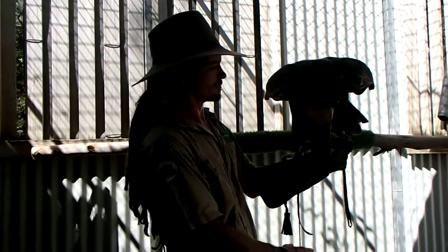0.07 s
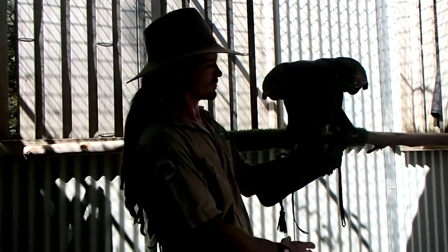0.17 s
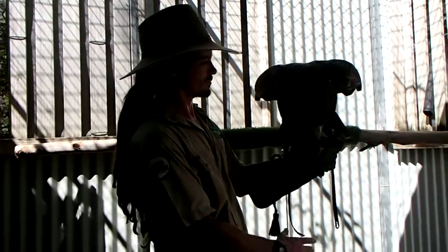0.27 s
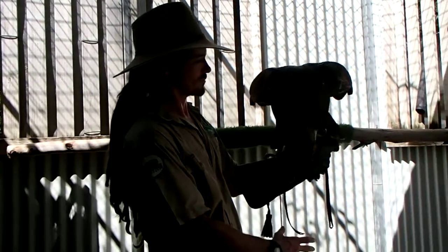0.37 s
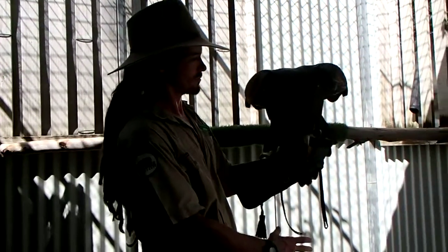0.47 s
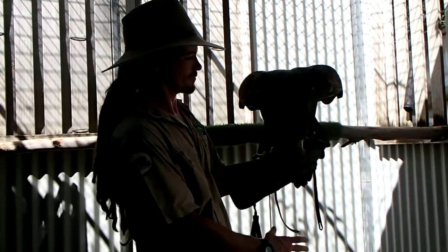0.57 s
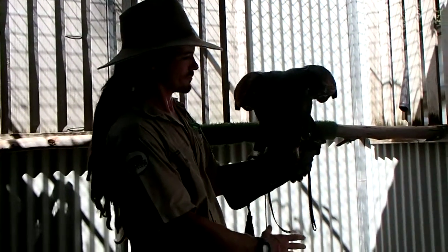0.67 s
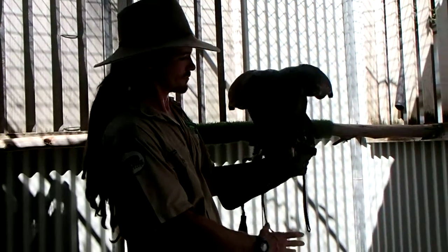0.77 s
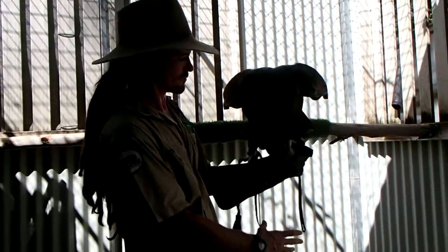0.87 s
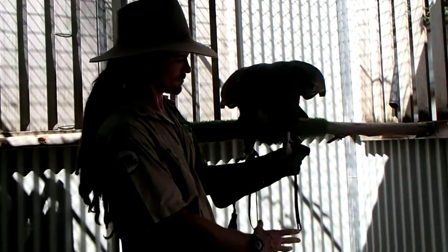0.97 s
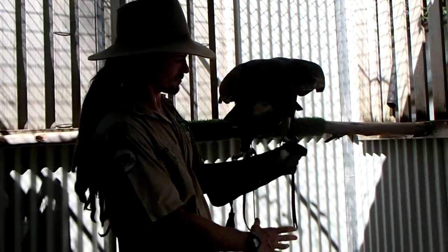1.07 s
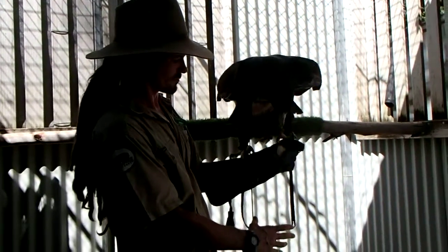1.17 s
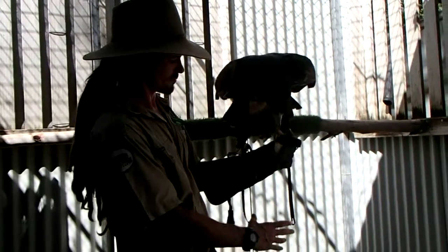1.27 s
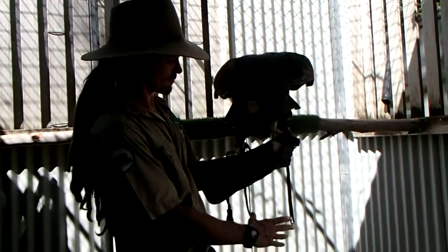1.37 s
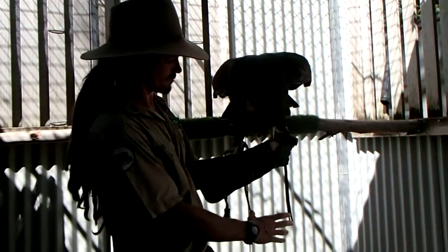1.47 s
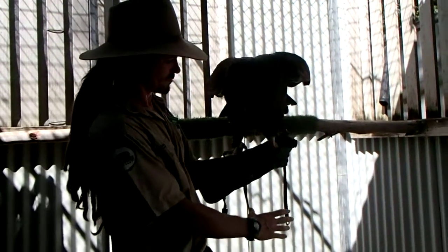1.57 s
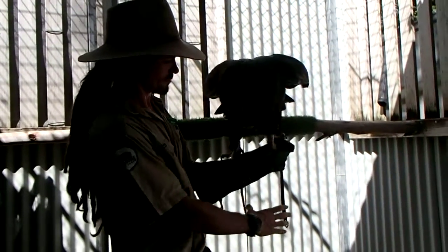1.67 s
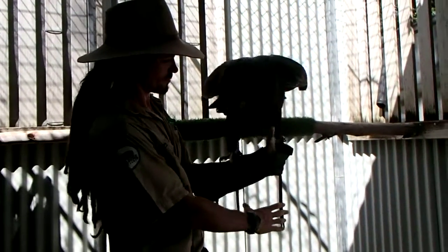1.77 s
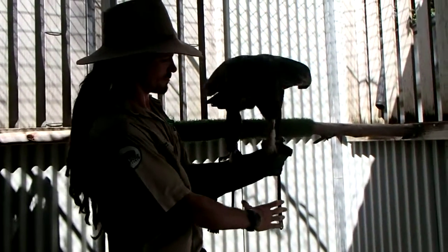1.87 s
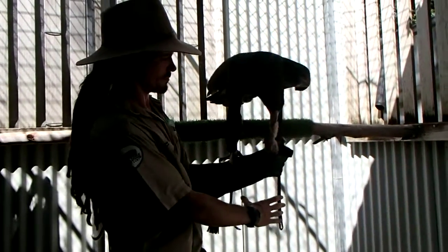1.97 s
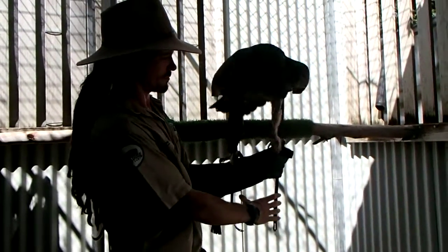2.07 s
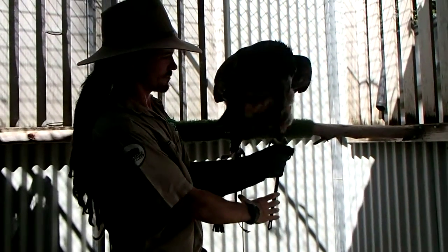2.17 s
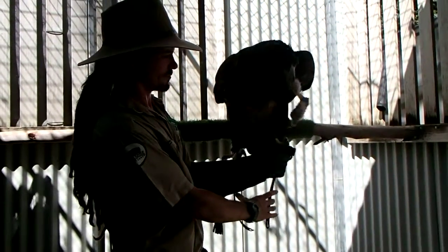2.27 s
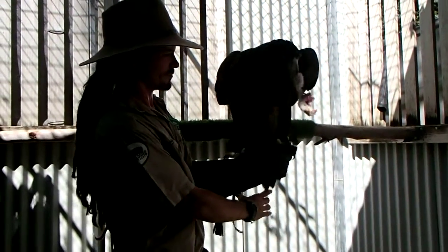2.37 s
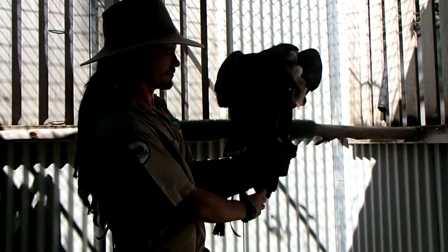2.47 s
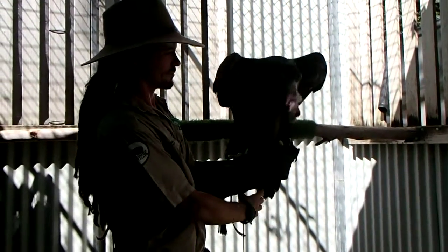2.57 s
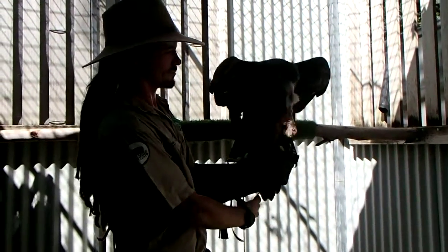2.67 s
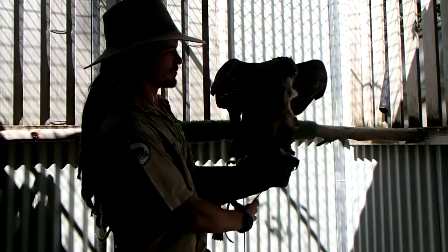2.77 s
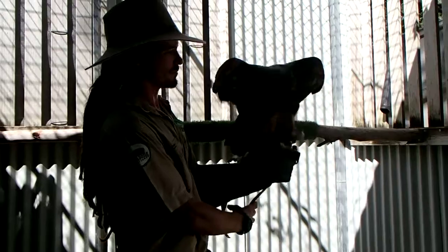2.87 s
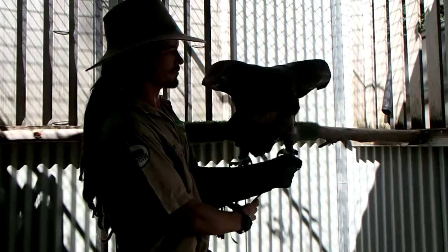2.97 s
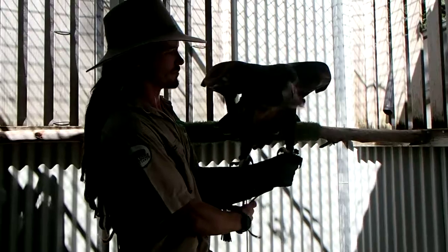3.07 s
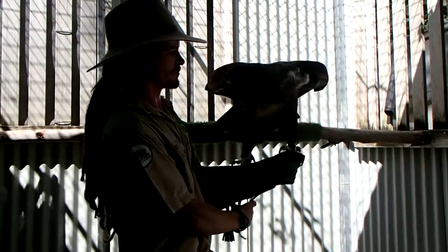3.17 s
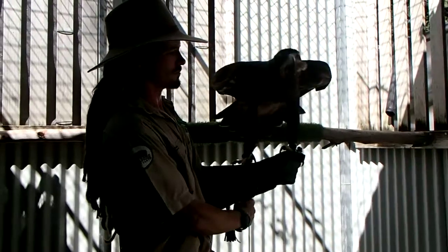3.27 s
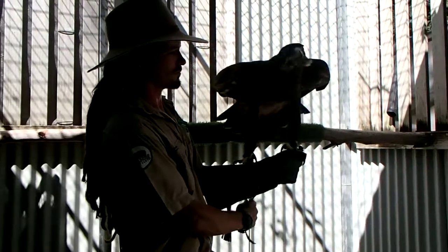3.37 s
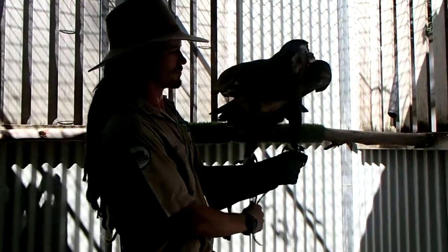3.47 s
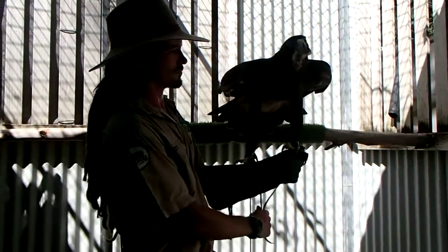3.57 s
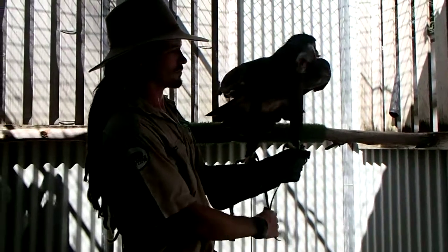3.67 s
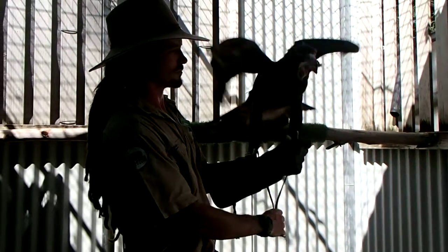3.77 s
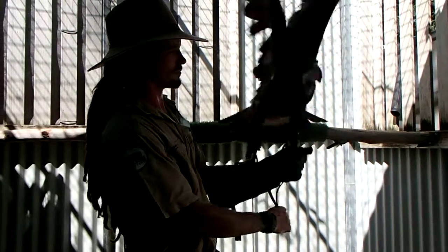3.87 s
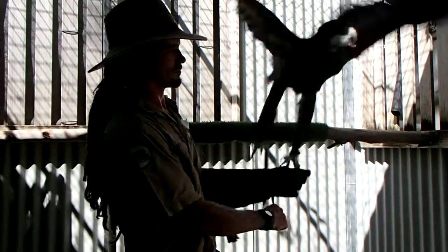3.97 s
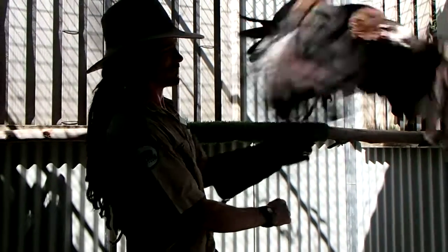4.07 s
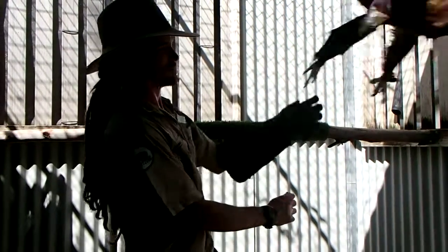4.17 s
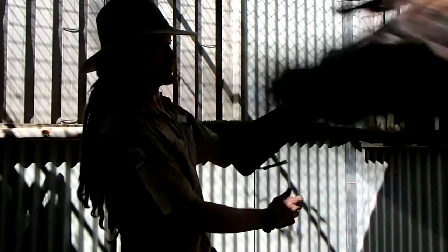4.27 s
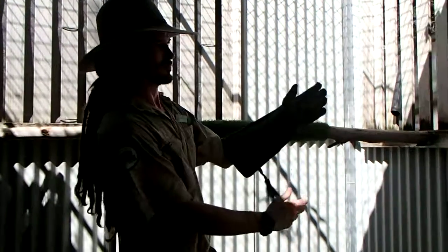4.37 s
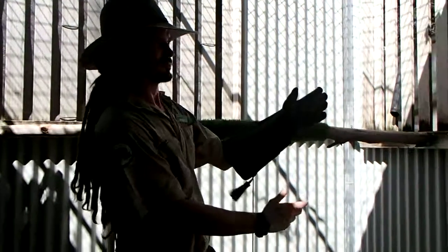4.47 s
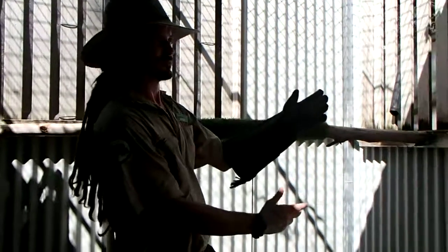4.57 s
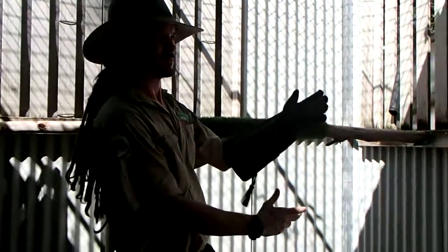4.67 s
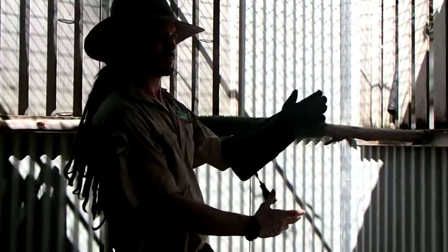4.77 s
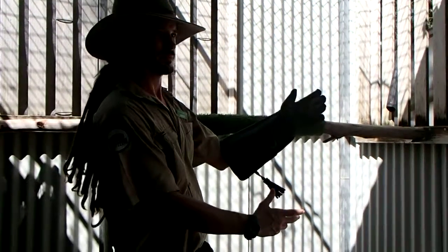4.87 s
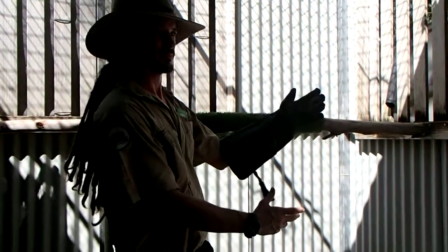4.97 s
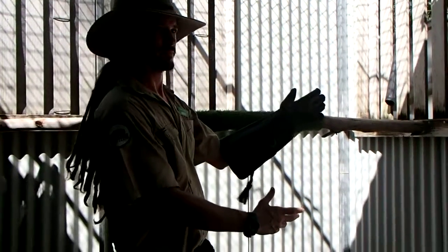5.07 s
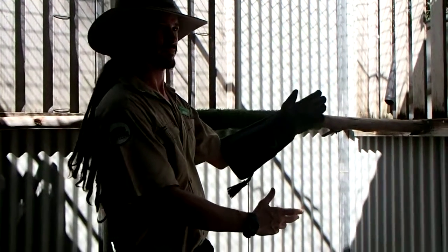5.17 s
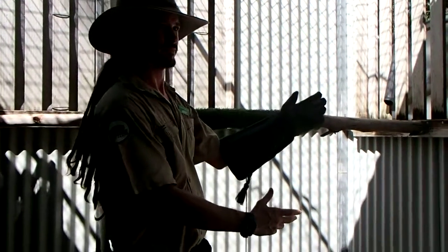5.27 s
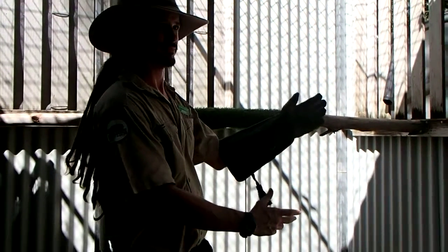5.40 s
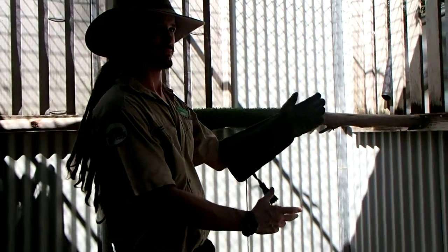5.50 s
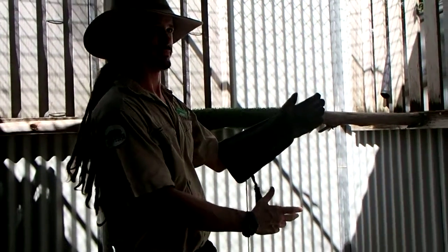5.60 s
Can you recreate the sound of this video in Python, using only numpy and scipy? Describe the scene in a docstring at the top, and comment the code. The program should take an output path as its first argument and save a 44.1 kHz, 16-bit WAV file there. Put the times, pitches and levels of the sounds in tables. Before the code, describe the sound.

In a quiet aviary, small birds chirp far off over a soft outdoor hush. Straps tick faintly on a leather glove, with one dry click close by, as a large bird ruffles its feathers. It then takes off with loud, cracking wing beats and passes close, its air buffeting the microphone. Farther away it flaps again and gives one short, hoarse high call.

```python
"""Take-off from the glove

In an aviary: quiet outdoor air, small birds far off, ticking straps and one dry click close by.
A large bird shifts on a leather glove, then takes off with cracking wing beats and flies past the
microphone. The wash of its wings buffets the microphone; farther off it flaps again, with one short
high call. Sheet-metal walls give a brief echo."""
import sys
import numpy as np
from scipy import signal
from scipy.fft import rfft, irfft, next_fast_len
from scipy.io import wavfile
from scipy.ndimage import map_coordinates

SR = 44100
rng = np.random.default_rng(int(sys.argv[2]) if len(sys.argv) > 2 else 0)


def log_audio(samples):
    """Write samples as a 16-bit WAV file to the path given in sys.argv[1]."""
    # one column per channel
    frames = np.atleast_2d(samples).T
    # limit to full scale, then quantise
    limited = np.clip(frames, -1, 1)
    pcm = np.round(limited * 32767).astype(np.int16)
    wavfile.write(sys.argv[1], SR, pcm)


N = 248724
TIME = np.arange(N) / SR


def amp(db):
    return 10 ** (np.asarray(db) / 20)


def unit(x):
    return x / np.sqrt(np.mean(x ** 2) + 1e-20)


def along(points, hz):
    """Interpolate (frequency [Hz], value) points on a log axis."""
    f, v = np.transpose(points)
    return np.interp(np.log(hz + 1), np.log(f + 1), v)


def level(rows, fade):
    """Gain per sample from (time [s], level [dB]) rows, dying away outside them."""
    s, db = np.transpose(rows)
    outside = np.abs(TIME - np.clip(TIME, s[0], s[-1]))
    return amp(np.interp(TIME, s, db)) * np.exp(-outside / fade)


def swell(s, rise, fall):
    """A gain that grows to 1 at time s and dies away; rise and fall are time constants [s]."""
    return np.exp(-np.where(TIME < s, (s - TIME) / rise, (TIME - s) / fall))


def wobble(rate, size=N):
    """A smooth random curve, rate knots a second."""
    knots = rng.standard_normal(size // 4 + 8)
    return map_coordinates(knots, [np.arange(size) * rate / SR], mode="mirror")


def filtered(x, response):
    """x through a frequency response."""
    m = next_fast_len(N + 8192)
    return irfft(rfft(x, m) * response(np.fft.rfftfreq(m, 1 / SR)), m)[:N]


def coloured(spectrum, gain=1):
    """Noise times a gain, shaped by (frequency [Hz], level [dB]) points, at rms 1."""
    return unit(filtered(rng.standard_normal(N) * gain, lambda hz: amp(along(spectrum, hz))))


def noise_band(width_hz, cycles):
    """A band of noise at rms 1 around a carrier whose phase is given in cycles."""
    size = next_fast_len(len(cycles))
    z = rng.standard_normal(size) + 1j * rng.standard_normal(size)
    z = np.fft.ifft(z / (1 + (np.fft.fftfreq(size, 1 / SR) / width_hz * 2) ** 4) ** .5)
    z /= np.sqrt(np.mean(np.abs(z) ** 2) / 2)
    return np.real(z[:len(cycles)] * np.exp(2j * np.pi * cycles))


def resonant(modes):
    """Noise ringing in (frequency [Hz], width [Hz], level [dB]) resonances."""
    return sum(amp(db) * noise_band(width, hz * TIME) for hz, width, db in modes)


def causal(gain):
    """The shortest one-sided pulse with this magnitude spectrum."""
    cep = irfft(np.log(np.maximum(gain, 1e-6)))
    half = len(cep) // 2
    return irfft(np.exp(rfft(np.r_[cep[0], 2 * cep[1:half], np.zeros(half)])))


def add(track, s, sound):
    """Mix a sound in from time s."""
    i = max(round(s * SR), 0)
    track[i:i + len(sound)] += sound[:max(N - i, 0)]


# Open air around the microphone: (frequency [Hz], level [dB])
AIR_COLOUR = [(15, -48), (25, -2), (74, -13.5), (99, -8.5), (189, -3.5), (235, -8), (382, -2.5),
              (437, -6.5), (473, -8), (691, 0), (1820, -3.5), (3490, -4), (5670, -13.5), (14200, -19.5),
              (15800, -25)]
# Low drones in that air: (frequency [Hz], width [Hz], level [dB])
DRONES = [(96.3, 14, -68), (133, 20, -67)]
# Twitter far away: (time [s], level [dB])
TWITTER = [(0, -45.5), (.17, -54), (2.6, -57), (3.03, -51), (3.42, -64)]
# Its spectrum: (frequency [Hz], level [dB])
TWITTER_COLOUR = [(1500, -46), (2600, -14), (3350, -0.5), (4100, -3.5), (5000, -13), (7000, -25)]


def air(hush_db=-51.14):
    """Steady outdoor hush with two faint drones and a blur of distant twitter."""
    hush = amp(hush_db + .22 * wobble(7.4)) * coloured(AIR_COLOUR)
    drones = np.zeros(N)
    for hz, width, db in DRONES:
        band = filtered(rng.standard_normal(N), lambda f: np.exp(-2 * ((f - hz) / width) ** 2))
        drones += amp(db) * unit(band)
    twitter = amp(-3 + 2 * wobble(13)) * level(TWITTER, fade=2) * coloured(TWITTER_COLOUR)
    return hush + drones + twitter


# Resonances of a wall panel far off: (frequency [Hz], width [Hz], level [dB])
PANEL_MODES = [(748, 32, -56), (947, 55, -45), (1170, 56, -53), (2010, 60, -46), (3220, 150, -54)]


def panel_bump():
    """A soft, distant knock rings and rattles a wall panel."""
    rattle = amp(-41) * coloured(FAR_WING_COLOUR)
    ring = amp(.5) * resonant(PANEL_MODES)
    return swell(.042, rise=.008, fall=.034) * (ring + rattle)


# Straps and talons on the glove: (time [s], level [dB], pitch [Hz], fall [s])
GLOVE_TICKS = [(.367, -47.5, 1380, .008), (1.565, -49, 1914, .025), (1.651, -44.5, 4210, .009),
               (1.888, -50.5, 900, .02), (2.168, -44, 3040, .01), (2.411, -35.5, 3200, .002),
               (2.759, -40, 3900, .009)]


def glove_ticks():
    """Small contacts on leather: a sharp start and a short, broad rasp."""
    out, t = np.zeros(N), np.arange(4096) / SR
    for s, db, hz, fall in GLOVE_TICKS:
        rasp = noise_band(.6 * hz, hz * t)
        add(out, s, amp(db) * np.exp(-t / fall) * rasp)
    return out


# Small birds far off: (time [s], length [s], pitch [Hz], glide [share of pitch], level [dB])
BIRD_NOTES = [(.41, .09, 4080, 0, -56), (.67, .18, 2980, -.03, -59), (1.181, .07, 2930, .02, -57),
              (2.413, .075, 3300, 0, -51.5), (2.413, .24, 2790, -.03, -55.3), (2.535, .22, 4210, .04, -57),
              (2.52, .32, 5500, -.025, -65.5), (2.758, .014, 2920, 0, -38.5),
              (3.082, .083, 2990, -.01, -58)]


def small_birds(faint_count=10, blur_hz=22, wavers_per_note=7):
    """Thin gliding notes, blurred by distance, with fainter ones at random."""
    out = np.zeros(N)
    faint = [(rng.uniform(0, N / SR), .12, rng.uniform(4000, 6300), rng.normal(0, .02), -65.5)
             for _ in range(faint_count)]
    for s, length, hz, glide, db in BIRD_NOTES + faint:
        progress = np.minimum(np.arange(16384) / SR / length, 2)
        pitch = hz * (1 + glide * np.minimum(progress, 1))
        effort = (1 - np.exp(-progress / .07)) * np.exp(-progress ** 3)
        width_hz = blur_hz * (hz / 3000) ** 4 + wavers_per_note / length  # high or short is broader
        add(out, s, amp(db) * effort * noise_band(width_hz, np.cumsum(pitch) / SR))
    return out


def feathers(spectrum, grain_db, flutter_db):
    """Vanes sliding over each other: noise broken into tiny grains and slower flutters."""
    return coloured(spectrum, gain=amp(grain_db * wobble(1500) + flutter_db * wobble(90)))


# The bird stirring on the glove: (time [s], level [dB], rise [s], fall [s])
RUFFLES = [(.52, -53, .02, 0.051), (2.168, -44, 0.068, 0.013), (2.745, -53.5, 0.053, .02),
           (2.98, -58, .04, 0.12), (3.58, -55, 0.15, 0.16), (3.9, -45.5, 0.081, .03)]
# Spectrum of its plumage: (frequency [Hz], level [dB])
PLUMAGE_COLOUR = [(300, -25), (1000, -5), (2500, -3.5), (3900, 1.5), (5500, -10), (8000, -18.5),
                  (15000, -18)]


def ruffles():
    """The perched bird shifts its weight and its plumage scratches softly."""
    motion = sum(amp(db) * swell(s, rise, fall) for s, db, rise, fall in RUFFLES)
    return motion * feathers(PLUMAGE_COLOUR, grain_db=1.5, flutter_db=1.3)


# Hard plastic beside the microphone: (frequency [Hz], level [dB], time to fall 60 dB [s])
PLASTIC_MODES = [(330, -19, 0.014), (685, -11, 0.008), (1385, -17, 0.019), (1560, -34, 0.015),
                 (3280, -9.5, 0.011), (4400, -13, 0.0092), (5700, -8, 0.0049), (8350, -20.5, .004),
                 (12300, -21, 0.0032)]


def plastic_click(start_s=1.3495, attack_s=.0004):
    """One dry click rings a small plastic body for a few milliseconds."""
    out, t = np.zeros(N), np.arange(2048) / SR
    ring = sum(amp(db - 60 * t / t60) * np.cos(2 * np.pi * hz * t) for hz, db, t60 in PLASTIC_MODES)
    add(out, start_s, ring * (1 - np.exp(-t / attack_s)))
    return out


# The flight: (time [s], distance [0 at the microphone, 1 at the far end])
FLIGHT_PATH = [(3.85, .12), (4.0, .27), (4.1, .07), (4.66, .03), (4.8, .8), (5.15, .995)]
# Wing strokes: (time [s], level [dB], rise [s])
WING_STROKES = [(3.964, -29, .005), (4.003, -20.5, .009), (4.103, -24.5, .024), (4.223, -25.5, .011),
                (4.277, -20, .005), (4.358, -29, .027), (4.499, -31.5, .009), (4.538, -32, .007),
                (4.638, -32.5, .026), (4.805, -35, .014), (5.157, -30.5, .009), (5.28, -37, .005),
                (5.393, -29, .007), (5.43, -30, .022), (5.532, -35, .008)]
# Feathers between strokes: (time [s], level [dB])
WING_RUSTLE = [(3.66, -61), (3.85, -41), (4.11, -29.5), (4.3, -37), (4.73, -39.5), (4.88, -45.5),
               (5.14, -46), (5.33, -36.5), (5.64, -40)]
# A wing close to the microphone: (frequency [Hz], level [dB])
NEAR_WING_COLOUR = [(47, -24), (80, -23.5), (393, -4.5), (449, -11), (714, -0.5), (1090, -2.5), (1160, -4),
                    (2360, -3.5), (3010, 0), (4190, -3), (5230, -12), (9290, -21.5), (14800, -22),
                    (15800, -31)]
# A wing at the far end; also colours the panel rattle and eddy hiss: (frequency [Hz], level [dB])
FAR_WING_COLOUR = [(150, -41), (250, -22), (546, -12), (595, -11.5), (638, -9.5), (1020, -2.5), (1490, -9),
                   (1660, -11.5), (1810, -10), (2190, -12.5), (3370, -12.5), (8460, -40), (15800, -56)]


def wings(fall_over_rise=1.35, far_linger_s=.045):
    """Strokes swell over a rustle; with distance they linger and sound duller and smoother."""
    path = np.transpose(FLIGHT_PATH)
    power = level(WING_RUSTLE, fade=.055) ** 2
    for s, db, rise in WING_STROKES:
        fall = fall_over_rise * rise + far_linger_s * np.interp(s, *path) ** 2
        power += (amp(db) * swell(s, rise, fall)) ** 2
    distance = np.interp(TIME, *path)
    near = feathers(NEAR_WING_COLOUR, grain_db=2, flutter_db=1.1)
    far = feathers(FAR_WING_COLOUR, grain_db=.1, flutter_db=.9)
    return np.sqrt(power * (1 - distance)) * near + np.sqrt(power * distance) * far


# Sharp cracks: snapping quills, and at 4.8 s the edge of an air puff hitting the microphone:
# (time [s], level [dB], treble tilt [dB/octave], weaker cracks before [count], and after [count])
CRACKS = [(3.962, -11.5, -4, 0, 0), (3.9911, -6, -4.5, 0, 0), (3.9966, -3, 0.5, 0, 0),
          (4.0008, 2.5, -3.8, 0, 1), (4.2122, -1.5, 3.5, 0, 1), (4.2674, -3, 1.8, 0, 1),
          (4.2818, -6.5, 4, 0, 0), (4.5351, -8.5, -3, 0, 0), (4.619, -21, 5, 0, 0), (4.8, -21, -5, 0, 0)]
# One crack at close range: (frequency [Hz], level [dB])
CRACK_COLOUR = [(88, -30), (150, -30), (447, -29.5), (1210, -7), (2300, -2.5), (2900, -1.5), (3200, 4),
                (4280, -5.5), (4720, -11), (11300, -33.5), (14300, -21), (15800, -18.5)]


def sharp_cracks(gap_s=.005, loss_db=6.5, stray_count=14, rattle=.068, rattle_t60=.036):
    """Stiff quills snap and one air puff hits the microphone: sharp pulses with a brief rattle."""
    out, t, hz = np.zeros(N), np.arange(2048) / SR, np.fft.rfftfreq(1024, 1 / SR)
    cracks = [(s + k * gap_s, db - loss_db * abs(k), tilt_db)
              for s, db, tilt_db, before, after in CRACKS for k in range(-before, after + 1)]
    stray_quills = [(rng.uniform(4.02, 4.66), rng.normal(-28, 2), 4) for _ in range(stray_count)]
    for s, db, tilt_db in cracks + stray_quills:
        pulse = causal(amp(along(CRACK_COLOUR, hz) + tilt_db * np.log2((hz + 500) / 3000)))
        blow = rattle * rng.standard_normal(len(t)) * amp(-60 * t / rattle_t60)
        blow[0] = 1  # the crack itself
        add(out, s, amp(db) * np.convolve(blow, pulse / np.abs(pulse).max()))
    return out


def eddy(t, hz, half_s, skirt=.12):
    """A few uneven swings of pressure around t = 0, with smaller and larger whirls in them."""
    phase = 2 * np.pi * (hz * t + rng.random()) + wobble(hz, len(t))
    shape = (1 - skirt) * np.exp(-(t / half_s) ** 2) + skirt / (1 + (t / half_s / 2) ** 4)
    whirls = .25 * wobble(3.5 * hz, len(t)) + .3 * wobble(1.3 * hz, len(t))
    swings = shape * (np.sin(phase) + whirls)
    return swings * np.linalg.norm(shape) / np.linalg.norm(swings) / np.sqrt(2)


# Eddies hitting the microphone: (time [s], level [dB], pitch [Hz], half length [cycles])
EDDIES = [(4.54, -29, 240, 3), (4.567, -9, 215, .9), (4.5765, -8.5, 750, 2.4), (4.65, -13, 620, 1.4),
          (4.667, -7.5, 610, .95), (4.705, -20, 240, .5), (4.769, -9.5, 860, 1.7),
          (4.8115, -11.5, 630, 3.8), (4.8758, -2.3, 720, .65), (4.94, -25, 560, 2),
          (5.005, -22.5, 400, 1.2), (5.03, -23.5, 480, 2), (5.108, -26, 230, 1.8), (5.157, -12, 600, 3.2),
          (5.25, -14.5, 261, 1.1), (5.388, -29, 290, 1.5)]
# Stirred air between them: (time [s], level [dB])
WASH = [(4.25, -51), (4.56, -42), (4.72, -44), (4.85, -40.5), (5.15, -40), (5.64, -49.5)]
# Its spectrum: (frequency [Hz], level [dB])
WASH_COLOUR = [(25, -13), (60, -4.5), (120, 6), (220, -3.5), (350, -6.5), (550, -14), (1200, -60)]


def wing_wash(slowest_hz=85, tip_s=.0012):
    """Eddies reach the microphone behind the bird: each is a fast core inside a slower swirl."""
    pressure, t = np.zeros(N), np.arange(-2048, 2048) / SR
    for s, db, hz, cycles in EDDIES:
        core = eddy(t, hz, half_s=cycles / hz)
        swirl = amp(-14.5) * eddy(t, 115 + .25 * hz, half_s=.008)
        add(pressure, s + t[0], amp(db) * (core + swirl))
    # eddies carry little very slow pressure
    gusts = filtered(pressure, lambda hz: hz ** 2 / np.hypot(hz ** 2, slowest_hz ** 2))
    # hiss at an eddy's tip grows with the square of its strength
    tips = sum(amp(2 * db - 18) * swell(s, tip_s, tip_s) for s, db, _, _ in EDDIES)
    hiss = tips * coloured(FAR_WING_COLOUR)
    stirred = coloured(WASH_COLOUR, gain=amp(5.5 * wobble(60)))
    return gusts + hiss + amp(1.5) * level(WASH, fade=.17) * stirred


# Throat resonances of the call, farther off: (frequency [Hz], width [Hz], level [dB])
THROAT_MODES = [(3300, 390, -31), (4040, 1000, -39.5), (2740, 250, -42)]


def high_call(start_s=5.302, rise_s=.016, hold_s=.035, fall_s=.034):
    """One hoarse high call: rough air through the throat's resonances, trailing off."""
    t = np.maximum(TIME - start_s, 0)
    effort = np.minimum(t / rise_s, 1) ** .5 * np.exp(-np.maximum(t - hold_s, 0) / fall_s)
    return amp(.3) * effort * resonant(THROAT_MODES)


# Echo of the aviary: (frequency [Hz], time to fall 60 dB [s])
AVIARY_DECAY = [(150, 0.29), (1000, .42), (4000, 0.35), (14000, 0.25)]


def aviary(x):
    """Sheet-metal walls answer after 5 ms; each frequency dies at its own speed."""
    hz, t, z = signal.stft(rng.standard_normal(SR // 2), SR, nperseg=256)
    tail = signal.istft(z * amp(-60 * t / along(AVIARY_DECAY, hz)[:, None]), SR, nperseg=256)[1]
    return signal.fftconvolve(x, np.pad(tail / np.linalg.norm(tail), (SR // 200, 0)))[:N]


def scene():
    """Feathers, calls and ticks echo in the aviary; the wing wash acts on the microphone directly."""
    plumage, cracks, click = wings() + ruffles(), sharp_cracks(), plastic_click()
    small_sounds = high_call() + glove_ticks() + panel_bump()
    birds = small_birds()
    echo = aviary(amp(-13) * plumage + amp(-8.5) * (cracks + small_sounds)
                  + amp(-5.5) * birds + amp(-26) * click)
    bed = amp(1) * plumage + small_sounds + birds + echo + air()
    dip = amp(-4 * swell(4.886, rise=.003, fall=.03))  # the bed dips briefly after the hardest eddy
    return (dip * bed + cracks + wing_wash() + click)[None]


def record(dry, low_cut_hz=65, ceiling=.9, top_hz=15800):
    """One microphone sheds deep bass; the loudest cracks clip; nothing passes above the band limit."""
    heard = filtered(dry[0], lambda hz: 1j * hz / (low_cut_hz + 1j * hz))
    clipped = np.clip(heard, -ceiling, ceiling)
    return filtered(clipped, lambda hz: hz < top_hz)[None]


dry = scene()
out = record(dry)
log_audio(out)
```